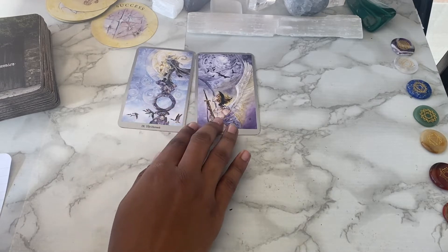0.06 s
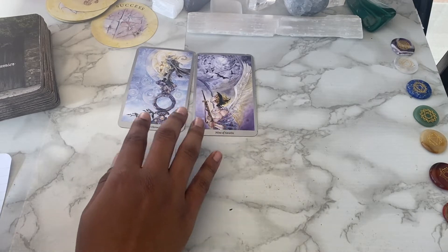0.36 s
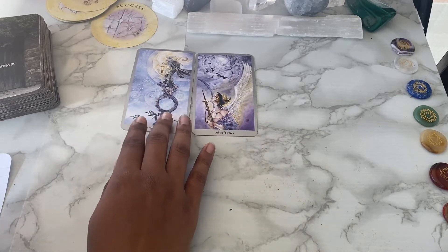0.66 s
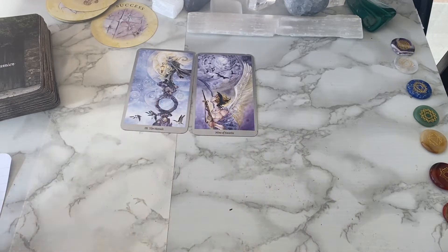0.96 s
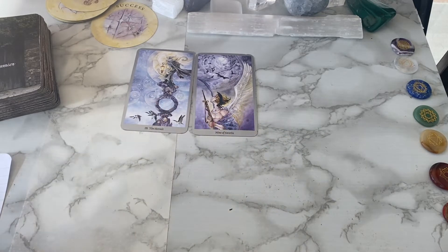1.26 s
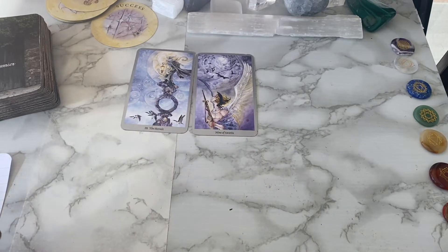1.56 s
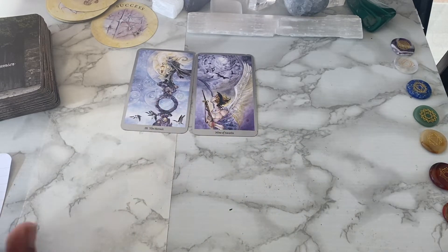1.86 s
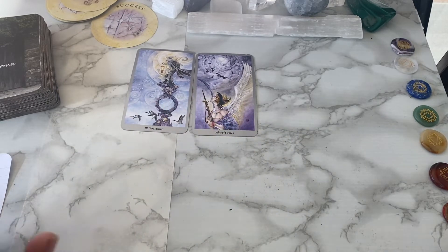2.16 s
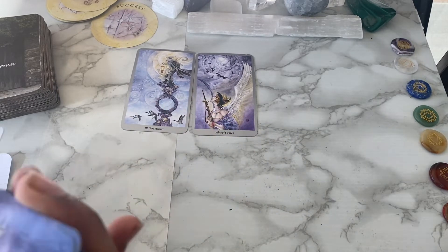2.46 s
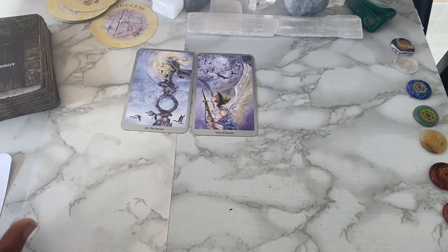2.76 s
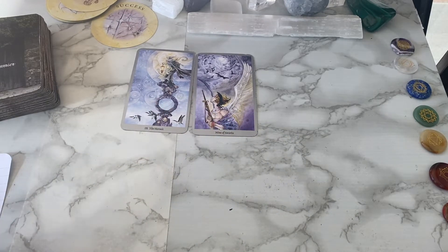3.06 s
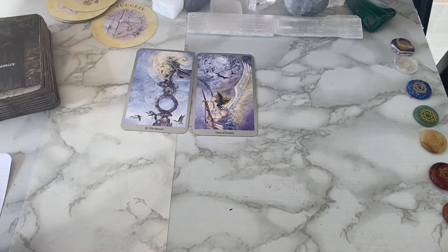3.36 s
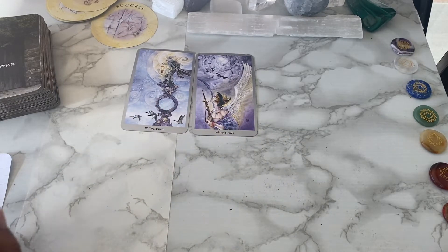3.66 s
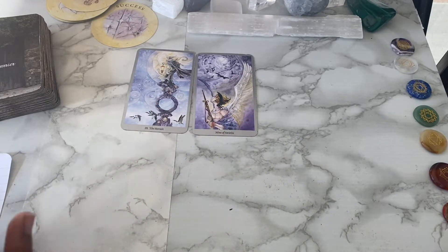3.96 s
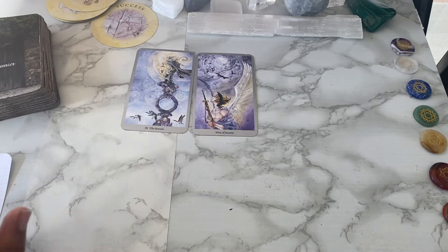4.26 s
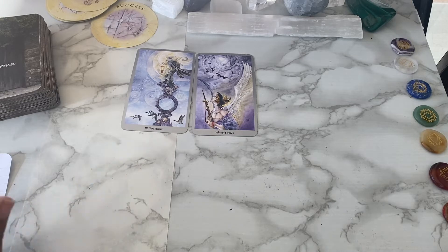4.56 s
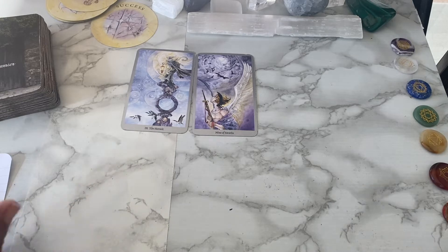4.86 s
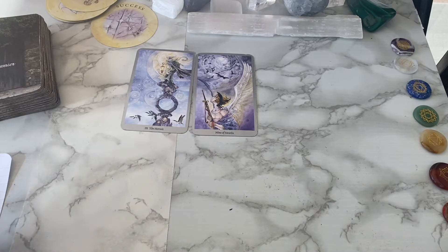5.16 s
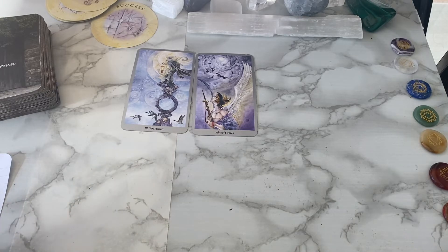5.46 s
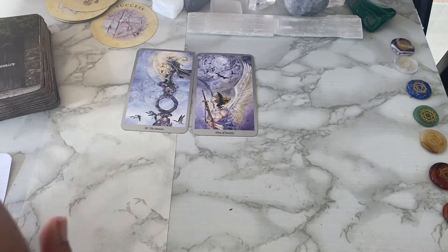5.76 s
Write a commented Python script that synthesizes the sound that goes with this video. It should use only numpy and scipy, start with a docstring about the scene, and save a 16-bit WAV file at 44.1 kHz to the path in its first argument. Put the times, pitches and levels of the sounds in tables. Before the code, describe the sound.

A deck of stiff cards is shuffled right beside the microphone, slightly to the left, over a low wavering hum and faint room noise. It starts very quietly, with one card dragged over a tabletop and a tiny squeak. Papery sliding follows and grows into several flurries of crisp edge snaps and soft thumps on the palm, with short lulls between them and a slight small-room echo.

```python
"""In a small room, fingertips nudge a card over a marble table with a very faint squeak. Then stiff
cards are shuffled just beside the microphone. Packets slide over each other in many tiny slips, which
make a grainy rasp. Edges catch and let go with a snap, and the deck knocks softly into the palm.
A low wavering hum and quiet room noise lie underneath."""
import sys
import numpy as np
from scipy import signal
from scipy.fft import rfft, irfft
from scipy.io import wavfile

SR = 44100
rng = np.random.default_rng(int(sys.argv[2]) if len(sys.argv) > 2 else 0)


def generate_wav(signal):
    """Clip the signal to [-1, 1] and save it as 16-bit WAV at the path in sys.argv[1]."""
    frames = np.transpose(np.atleast_2d(signal))
    scaled = np.clip(frames, -1, 1) * 32767
    pcm = np.round(scaled).astype(np.int16)
    wavfile.write(sys.argv[1], SR, pcm)


N = 264600
TIME = np.arange(N) / SR

# Card sliding over card: start t/s, speeding up/s, slowing down/s, rasp level/dB,
# flexing body over rasp/dB, edge hiss over rasp/dB
STROKES = [(0.0, 0.0072, 0.087, -62, -1.5, -4), (0.565, 0.017, .25, -79, -9, 5),
           (0.865, 0.087, 0.14, -53, -12.5, 1), (1.1, 0.036, .05, -55, -6, -8),
           (1.3, 0.05, 0.071, -56.5, 0, 2), (1.41, 0.023, 0.089, -62, 0, -2),
           (1.53, 0.096, 0.097, -51.5, -10, 3), (1.61, 0.027, 0.02, -48.5, -19, 11.5),
           (1.635, 0.026, 0.018, -42, 9, -11), (1.845, 0.011, 0.2, -38.5, -3.5, -7),
           (1.945, .03, 0.047, -42, 0.5, 3.5), (2.13, 0.044, 0.025, -29.5, -0.5, -8),
           (2.215, 0.086, 0.087, -42, -0.5, -2), (2.511, 0.063, 0.059, -39.5, -6.5, 2.5),
           (2.58, 0.07, 0.018, -46.5, 3, -19), (2.77, 0.021, .04, -58.5, -4, 3),
           (2.805, 0.012, 0.067, -52.5, -19, 3), (2.88, 0.17, 0.024, -48.5, -11, -1),
           (3.19, 0.038, 0.044, -52, -3.5, 2), (3.37, .025, 0.13, -58, 4, 3),
           (3.53, 0.026, 0.046, -41.5, -2.5, -6), (3.565, 0.085, 0.063, -48.5, -4.5, 5.5),
           (3.648, 0.01, 0.034, -43, 11, -11), (3.699, 0.016, 0.19, -39, 3.5, -3.5),
           (3.785, 0.016, 0.1, -31, -7.5, -4.5), (3.951, 0.027, .045, -34.5, -3, 1.5),
           (4.02, 0.025, 0.42, -50.5, -1.5, -3.5), (4.145, 0.087, 0.062, -39.5, -2, -6),
           (4.265, 0.021, 0.048, -37.5, -0.5, -4.5), (4.48, 0.034, 0.063, -39.5, -5, -0.5),
           (4.55, 0.064, 0.051, -42.5, -8, 4), (4.63, 0.015, 0.027, -42.5, 7.5, -6),
           (4.765, 0.093, .02, -55, 1, 4), (4.822, 0.024, 0.024, -30, -2, -1),
           (4.865, 0.014, 0.071, -48.5, 7.5, -2), (4.965, 0.044, 0.072, -47.5, -7.5, -0.5),
           (5.115, 0.019, 0.081, -50.5, -5.5, 3), (5.29, 0.016, 0.3, -71.5, -5.5, 9.5),
           (5.492, 0.021, 0.39, -56.5, -4, -2.5), (5.564, .04, .03, -56, -7, 1.5),
           (5.608, .014, 0.028, -40, -13, 9), (5.63, .022, 0.024, -40, 0, -4.5),
           (5.801, 0.022, 0.016, -32.5, 1, -3), (5.832, .006, 0.21, -38.5, -14, -6),
           (5.91, .068, 0.016, -29.5, -4.5, -5)]
# Card edges snapping: t/s, level/dB, brightness/dB, ring f/Hz, time to fade by 60 dB/s, left over right/dB
SNAPS = [(0.6667, -66.5, 19, 4430, 0.016, 0), (0.7116, -73.5, 12, 4950, .018, -3),
         (0.841, -71, 24, 4950, 0.0061, -1), (0.878, -58.5, -12, 2020, .028, 2),
         (1.0608, -58, 12, 2840, 0.0062, 1), (1.1367, -41, 4, 4400, 0.015, 1),
         (1.2281, -59, 10, 4410, 0.041, 1), (1.3081, -45.5, -6.5, 1720, 0.016, 8),
         (1.5707, -42, -2.5, 1660, .014, 4.5), (1.6584, -37, 9, 4700, 0.0056, 0),
         (1.8441, -37.5, 2.5, 3550, 0.013, 11.5), (1.8511, -29.5, 14.5, 1450, 0.0024, 1),
         (1.859, -26.5, -2.5, 1610, 0.0055, 1), (2.0709, -39.5, -6.5, 700, 0.042, 3),
         (2.0838, -42, 7, 1440, 0.0046, 1), (2.1288, -23.5, 0.5, 1910, .009, 1.5),
         (2.137, -25, -2, 3960, 0.0082, 2), (2.159, -33.5, -11.5, 1100, 0.046, 1),
         (2.1823, -26, -2, 1060, 0.016, 6), (2.1879, -17, -8.5, 973, .008, 2),
         (2.1909, -38, -12.5, 657, 0.029, -3.5), (2.232, -22.5, 0.5, 1750, 0.0049, 0),
         (2.284, -21, -1, 2250, 0.025, -0.5), (2.31, -31, 2.5, 2550, 0.022, 0),
         (2.3567, -39.5, 9, 3140, 0.018, 0), (2.7749, -46.5, 2.5, 2990, 0.064, 1),
         (2.936, -46, 5.5, 5080, 0.024, -1), (3.113, -45, 2, 2650, 0.012, -1),
         (3.1745, -47, 2, 5500, 0.013, -2), (3.3907, -43.5, -0.5, 3820, .025, -2.5),
         (3.6555, -32.5, 11, 5830, 0.008, 1.5), (3.7079, -35.5, -12.5, 1020, 0.046, 4),
         (3.7477, -31, -6, 5040, 0.031, 1), (3.7915, -19, -0.5, 3960, 0.0095, 8.5),
         (3.7933, -18.5, 1, 2770, 0.016, -5.5), (3.8329, -19, 2, 1380, .018, -2),
         (3.8882, -35, -7, 2120, 0.011, 2.5), (3.9505, -19, 3, 5750, .011, .5),
         (3.99, -29.5, -5.5, 490, 0.071, 3.5), (4.095, -39.5, -2, 3620, 0.0065, 0),
         (4.1637, -38.5, -7, 2300, 0.054, 3.5), (4.212, -33, 5, 2540, .014, 1),
         (4.24, -41.5, -21, 756, 0.033, 4.5), (4.2448, -23, 1, 1960, 0.03, 4),
         (4.255, -29.5, 15, 4740, 0.012, -2.5), (4.476, -52.5, 7, 2046, .015, 10),
         (4.5147, -29.5, 7.5, 2070, 0.014, 1), (4.5191, -32, -7.5, 2170, 0.014, 0.5),
         (4.8339, -33.5, -3, 1750, 0.0064, -7), (4.853, -32, 0, 1650, .02, 2),
         (4.931, -49.5, -14.5, 710, 0.018, 5), (5.2979, -65, 15.5, 5850, 0.015, -3.5),
         (5.497, -48, 2, 1700, 0.024, -4), (5.784, -48.5, -3, 1640, 0.017, 5),
         (5.8095, -26.5, 7.5, 4250, 0.0037, 2.5), (5.8277, -20.5, 4.5, 1600, 0.0059, -1),
         (5.8327, -21, -1.5, 2030, 0.019, 2), (5.9254, -26.5, 0.5, 1490, 0.017, 1.5),
         (5.978, -29.5, -5.5, 2500, 0.025, -3)]
# The three parts of a card's sound (low body, middle rasp, high hiss): lowest f/Hz, highest f/Hz
BANDS_HZ = [(150, 1100), (1100, 6000), (6000, 17000)]


def from_db(db):
    """Turn decibels into a factor to multiply a sound by."""
    return 10 ** (np.asarray(db) / 20)


def rms_one(x):
    """Scale a sound so that its average strength (rms) is 1."""
    return x / np.sqrt(np.mean(x ** 2) + 1e-20)


def at_hz(points, hz):
    """Read between the rows of a table, with frequency spaced as the ear hears it."""
    f, value = np.transpose(points)
    return np.interp(np.log(hz + 1), np.log(f + 1), value)


def band(x, edges_hz, order=2):
    """Keep what lies between two frequencies; a higher order cuts more steeply."""
    sections = signal.butter(order, np.clip(edges_hz, 10, .45 * SR), "band", fs=SR, output="sos")
    return signal.sosfilt(sections, x)


def coloured(x, spectrum):
    """Turn each frequency up or down as a table says."""
    return irfft(rfft(x) * from_db(at_hz(spectrum, np.fft.rfftfreq(N, 1 / SR))), N)


def drift(rate_hz):
    """A smooth random wobble of typical size 1, with little in it faster than rate_hz."""
    coarse = TIME[::20]
    hz = np.fft.rfftfreq(len(coarse), coarse[1])
    slow = irfft(rfft(rng.standard_normal(len(coarse))) / (1 + (hz / rate_hz) ** 4), len(coarse))
    return np.interp(TIME, coarse, rms_one(slow))


def resonance(x, hz, width_hz):
    """Let a sound ring at one frequency; the narrower the width, the longer it rings."""
    r = np.exp(-np.pi * width_hz / SR)
    feedback = [1, -2 * r * np.cos(2 * np.pi * hz / SR), r * r]
    return signal.lfilter(np.array([1, 0, -1]) * (1 - r * r) / 2, feedback, x + 1e-18)


def panned(x, pan_db):
    """Make the left side pan_db louder than the right."""
    return x * from_db(np.array([[.5], [-.5]]) * pan_db)


def sliding_gains():
    """Strength of body, rasp and hiss over time: the faster a card slides, the louder it rubs."""
    drag_db, grip_db, scrape_db = (-76, -80.5, -80), (-71, -76, -73.5), (-7, -2.5, -10.5)  # per band
    slowed_db, slowing_curve, speed_law = 13.5, 1.84, 1.15
    swell_db_per_s, fade_db_per_s = 1304, 700
    # Fingertips drag a card over the marble; after 1 s the cards keep shifting faintly in the grip.
    held = TIME > 1
    uneven_db = 2.0 * drift(2.7)
    power = np.array([from_db(np.where(held, grip, drag) + uneven_db) ** 2
                      for grip, drag in zip(grip_db, drag_db)])
    for start, rise_s, fall_s, db, body_db, hiss_db in STROKES:
        moving = (TIME > start) & (TIME < start + .5)
        t = TIME[moving] - start
        speeding_up = np.sin(np.pi / 2 * np.minimum(t / rise_s, 1))
        slowing = np.maximum(t - rise_s, 0) / fall_s
        speed = speeding_up * from_db(-slowed_db * slowing ** slowing_curve)
        strengths = from_db(db + np.array([body_db, 0, hiss_db]))
        power[:, moving] += np.outer(strengths, speed ** speed_law) ** 2
    # An edge scrapes up to its snap and on after it, more quietly than the snap itself.
    for s, db, bright_db, *_ in SNAPS:
        near = slice(max(int(s * SR) - SR // 20, 0), int(s * SR) + SR // 20)
        t = TIME[near] - s
        scrape = from_db(-11 + np.minimum(swell_db_per_s * t, -fade_db_per_s * t))
        strengths = from_db(db + np.array([-bright_db, 0, bright_db]) + scrape_db)
        power[:, near] += np.outer(strengths, scrape) ** 2
    return np.sqrt(power)


def friction(per_s, size_db):
    """Tiny slips of uneven size, mixed with the smooth noise of fibres brushing."""
    sizes = from_db(size_db * np.minimum(rng.exponential(1, N), 4)) * rng.choice([-1, 1], N)
    slips = (rng.random(N) < per_s / SR) * sizes / np.sqrt(per_s)
    return rms_one(rms_one(slips) + rng.standard_normal(N))


def deck(x):
    """The held deck rings a little, which lifts some frequencies of each rub and snap."""
    # Where the deck rings: f/Hz, width/Hz, boost/dB
    deck_rings = [(395, 40, 4.5), (700, 150, 6), (1064, 205, 3), (1568, 310, 6), (1955, 410, 4.5),
                  (2464, 260, 5), (4420, 440, 1.5)]
    return x + sum((from_db(db) - 1) * resonance(x, hz, width) for hz, width, db in deck_rings)


def bending(x, depth, sharpness):
    """As the cards bend and the grip shifts, papery rings come and go."""
    centres_hz = np.geomspace(300, 6000, 14)
    return x + depth * sum(resonance(x, hz, hz / sharpness) * drift(6) for hz in centres_hz)


def slides(trim_db, judder_db, slips_per_s, spread):
    """Cards rasp: harder sliding makes more slips a second, and the grip shakes all bands together."""
    # Tone colour of card rubbing on card: f/Hz, level/dB
    card_colour = [(170, 4), (310, -2), (520, -6), (720, -7.5), (1050, -5.5), (1500, -3), (2400, -1),
                   (3400, 0.5), (5000, -3), (7000, -5), (10000, -6), (13500, -9.5)]
    gains = sliding_gains()
    per_s = slips_per_s * (gains[1] / from_db(-40.5)) ** .3  # equals slips_per_s at a rasp of -40.5 dB
    centre, card_edges = (friction(per_s, size_db=2.5) for _ in range(2))
    # A card rubs along its whole width, so each side hears partly different slips.
    slips = centre + spread * band(card_edges, (250, 7000), order=1) * np.array([[1], [-1]])
    rasp = bending(deck(coloured(slips, card_colour)), depth=0.87, sharpness=11.0)
    grip_db = judder_db * drift(90)
    return sum(rms_one(band(rasp, edges, order=3)) * gain * from_db(trim + grip_db)
               for edges, gain, trim in zip(BANDS_HZ, gains, trim_db))


def hum(pitch_hz, waver_hz, trim_db, flutter_db, rumble_db, upper_hz, upper_db):
    """A low tone swells, flutters and wavers, with rumble around it and a faint higher tone."""
    # Slow swell of the low tone, in two stretches: t/s, level/dB
    hum_swell = [
        [(0.0, -49), (0.15, -36.5), (1.54, -60), (1.63, -43), (2.34, -42.5), (2.49, -74), (2.54, -42.5),
         (3.38, -59.5), (3.5, -56)],
        [(4.0, -45), (4.31, -46.5), (4.46, -72), (4.5, -50), (5.24, -48), (5.25, -75), (5.49, -41.5),
         (5.58, -58), (6.0, -39.5)],
    ]
    swell_db = np.interp(TIME, *np.vstack(hum_swell).T)
    hz = pitch_hz + waver_hz * drift(8.56)
    tone = np.sqrt(2) * np.sin(2 * np.pi * np.cumsum(hz) / SR)
    rumble = rms_one(band(rng.standard_normal(N), (48, 125), order=3))
    upper = rms_one(resonance(rng.standard_normal(N), upper_hz, width_hz=6.7))
    tone_db = swell_db + trim_db + flutter_db * drift(16)
    return tone * from_db(tone_db) + rumble * from_db(rumble_db) + upper * from_db(upper_db)


def air(level_db, apart_db):
    """Room noise, alike on both sides in the bass and different in the treble."""
    # Tone colour of the still room: f/Hz, level/dB
    air_colour = [(15, -31.5), (25, -16.5), (49, -8.5), (82, -1), (99, -10), (123, -10), (180, -20.5),
                  (263, -22.5), (373, -33), (1370, -47.5), (8590, -60), (9840, -60), (12200, -82),
                  (16000, -81)]
    middle, side = coloured(rng.standard_normal((2, N)), air_colour)
    side = from_db(apart_db) * band(side, (250, 17000), order=1)
    above_bass = np.std(band(middle, (110, 16000), order=4))  # level_db leaves out the deep bass
    return from_db(level_db) * (middle + side * np.array([[1], [-1]])) / above_bass


def catches():
    """An edge catches faintly at a random moment in the fast part of each stroke: rows like SNAPS."""
    under_db, bright_db, ring_hz, fade_s = 4, 3.5, 2794, 0.16
    rows = []
    for start, rise_s, fall_s, db, *_ in STROKES:
        when, octaves, side = rng.uniform(-1, 1, 3)
        s = start + rise_s + when * (fall_s if when > 0 else rise_s) / 2
        rows.append((s, db - under_db, bright_db, ring_hz * 2 ** octaves, fade_s, 2 * side))
    return rows


def snaps(trim_db, ring_gain, scatter, spread, build_s):
    """An edge lets go: a burst of small contacts around one sharp one, and the card rings briefly."""
    card_sharpness = 2.8  # frequency over width: low, as cardboard soon stops ringing
    out, t = np.zeros((2, N + SR)), TIME[:SR // 16]
    for s, db, bright_db, ring_hz, fade_s, pan_db in SNAPS + catches():
        centre = rng.standard_normal(len(t))
        along_edge = centre + spread * band(rng.standard_normal((2, len(t))), (250, 7000), order=1)
        contacts = scatter * along_edge * (1 - np.exp(-t / build_s)) * from_db(-60 * t / fade_s)
        contacts[:, SR // 1500] += 1  # the sharp contact
        swing = np.sqrt(2000 / ring_hz)  # slow bending swings wider
        ring = swing * resonance(contacts, ring_hz, ring_hz / card_sharpness)
        card = deck(contacts + ring_gain * ring)
        snap = 0
        # A bright snap has less body and more tick.
        for edges, tilt_db, trim in zip(BANDS_HZ, (-bright_db, 0, bright_db), trim_db):
            part = band(card, edges, order=3)
            strength = np.sqrt(np.sum(part ** 2) / 2 / (SR // 200))  # as if packed into 5 ms
            snap = snap + part / strength * from_db(db + tilt_db + trim)
        start = int(s * SR)
        out[:, start:start + len(t)] += panned(snap, pan_db)
    return out[:, :N]


def squeak(start_s, length_s, from_hz, to_hz, level_db, rough_db, fade_db):
    """A dragging fingertip squeaks very faintly, fading and sinking in pitch as it slows."""
    progress = np.clip((TIME - start_s) / length_s, 0, 1)
    hz = from_hz + (to_hz - from_hz) * progress + 25 * drift(120)
    grip = np.interp(progress, [0, .08, .92, 1], [0, 1, 1, 0])
    strength = from_db(level_db - fade_db * progress + rough_db * drift(60))
    return strength * grip * np.sin(2 * np.pi * np.cumsum(hz) / SR)


def knocks(boost_db):
    """The deck hits the palm and wakes only low tones: a fleshy blow is deeper, a firm one brighter."""
    # Blows of the deck on the hand: t/s, level/dB, tilt towards high tones/(dB per octave)
    blows = [(2.187, -26, 15.5), (2.233, -24, 12.5), (2.288, -33, 21.5), (2.659, -38, 2), (3.662, -36, 5.5),
             (3.799, -32, -8.5), (3.815, -25, -5), (3.829, -21.5, 3), (4.242, -32, 13), (4.293, -33, 3),
             (4.522, -44, -10), (4.836, -32.5, 16), (4.859, -32.5, 9), (5.666, -37, -1), (5.933, -43, 18),
             (5.979, -36, 13)]
    # Low tones of deck and hand: f/Hz, level/dB, time to fade by 60 dB/s
    low_tones = [(65, -11, 0.17), (112, 0, 0.089), (157.7, -11.5, 0.12), (225, -9.5, 0.055),
                 (414.4, -21.5, 0.041)]
    out, t = np.zeros(N + SR), TIME[:SR // 3]
    soft_onset = 1 - np.exp(-t / 0.0032)
    for s, db, tilt in blows:
        start = int(s * SR)
        for hz, tone_db, fade_s in low_tones:
            detune, chance_db = rng.normal([1, 0], [.04, 1.5])
            ring = np.sin(2 * np.pi * hz * detune * t) * soft_onset
            strength_db = db + boost_db + tone_db + tilt * np.log2(hz / 150) + chance_db
            out[start:start + len(t)] += ring * from_db(strength_db - 60 * t / fade_s)
    return out[:N]


def room(x, gap_s):
    """Many reflections blur into a short echo, different on each side; the treble dies first."""
    # How long the room rings: f/Hz, time to fade by 60 dB/s
    fade_times = [(150, 0.53), (1000, 0.4), (4000, 0.37), (15000, 0.03)]
    t, tail = TIME[:SR * 3 // 4], 0
    edges_hz = np.geomspace(100, 17000, 8)
    for low, high in zip(edges_hz, edges_hz[1:]):
        fade_s = at_hz(fade_times, np.sqrt(low * high))
        tail = tail + band(rng.standard_normal((2, len(t))), (low, high)) * from_db(-60 * t / fade_s)
    tail = tail * np.clip(t / gap_s - .5, 0, 1)  # reflections take a moment to arrive
    tail = tail / np.sqrt(np.sum(tail ** 2, axis=1, keepdims=True))
    return signal.fftconvolve(x, tail, axes=1)[:, :N]


def microphone(x, left_db):
    """Close sound reaches the microphone's two openings with different level and timing."""
    # Level difference between the openings: f/Hz, left over right/dB
    balance = [(60, -2.5), (130, -4.5), (250, -5.5), (520, 7), (750, 0), (1100, 0.5), (1400, -5.5),
               (2400, 4.5), (4400, 2.5), (8000, -1.5), (15000, -2)]
    # How far the wave on the left runs ahead: f/Hz, phase/radians
    left_lead = [(0, 0), (200, 0), (600, .3), (1640, 5.0), (2500, 6.8), (6500, 6.6), (10200, 0),
                 (16200, -9.4)]
    hz = np.fft.rfftfreq(N, 1 / SR)
    response = panned(np.ones(len(hz), complex), at_hz(balance, hz) + left_db)
    response[1] *= np.exp(-1j * np.interp(hz, *np.transpose(left_lead)))
    return irfft(rfft(x) * response, N)


def scene():
    """Cards close by and a little to the left, their echo, the squeak, and the room's hum and noise."""
    sliding = slides(trim_db=(-1.5, -1.0, -1.0), judder_db=2.5, slips_per_s=1800, spread=0.47)
    snapping = snaps(trim_db=(-4.5, 0.8, -6.5), ring_gain=2.03, scatter=0.8, spread=0.96, build_s=0.00043)
    cards = sliding + snapping + knocks(boost_db=6.0)
    echo = from_db(-13.0) * room(cards, gap_s=0.0046)
    low_hum = hum(pitch_hz=72.6, waver_hz=3.0, trim_db=-2.0, flutter_db=2.0,
                  rumble_db=-60.5, upper_hz=253.7, upper_db=-70)
    fingertip = squeak(start_s=0.565, length_s=0.42, from_hz=2490, to_hz=2340,
                       level_db=-73.0, rough_db=3.0, fade_db=6.0)
    room_noise = air(level_db=-60, apart_db=-1.5)
    return microphone(cards, left_db=2.0) + echo + fingertip + low_hum + room_noise


def record(dry):
    """Clip peaks at full scale, then cut away the highest treble."""
    cutoff_hz = 15900
    low_pass = signal.ellip(10, .2, 70, cutoff_hz, fs=SR, output="sos")
    return signal.sosfilt(low_pass, np.clip(dry, -1, 1))


dry = scene()
out = record(dry)
generate_wav(out)
```